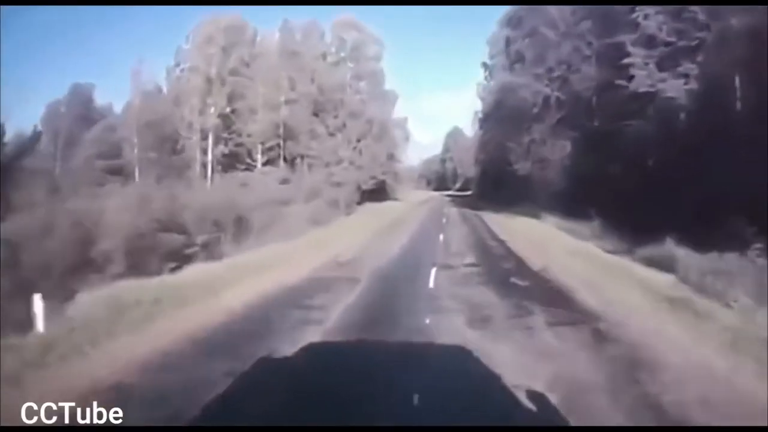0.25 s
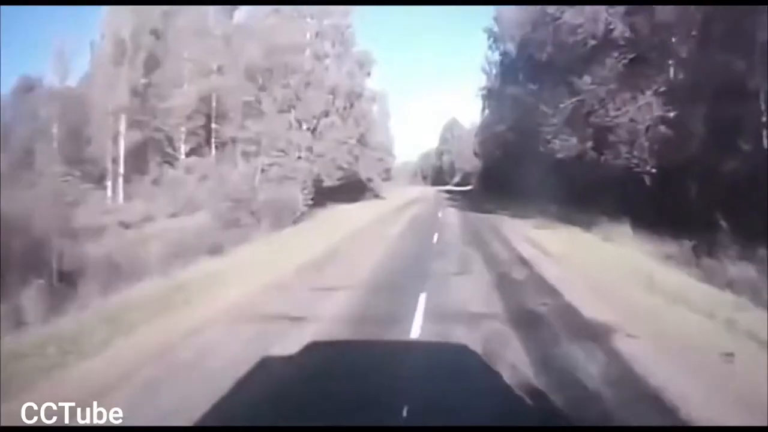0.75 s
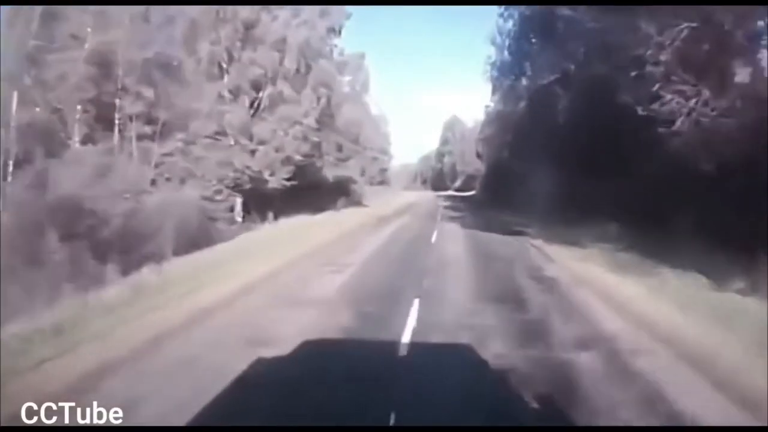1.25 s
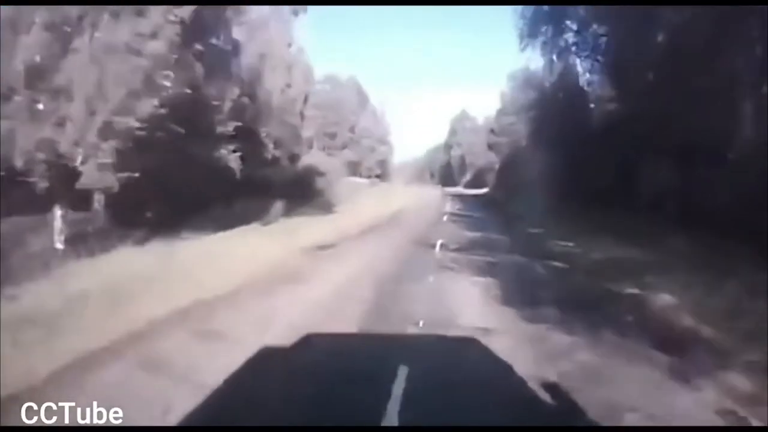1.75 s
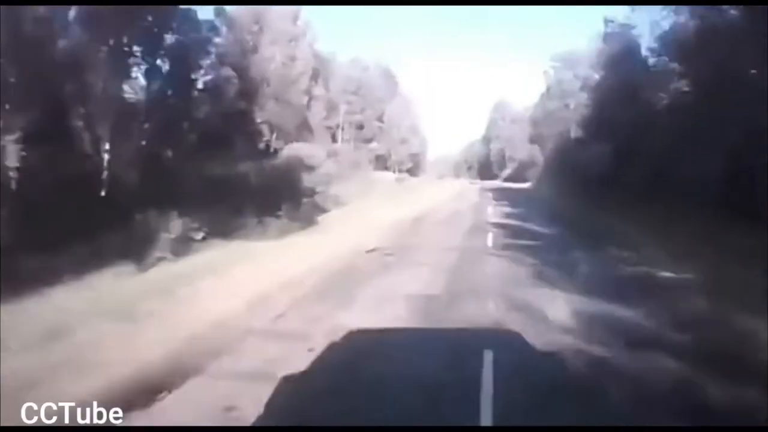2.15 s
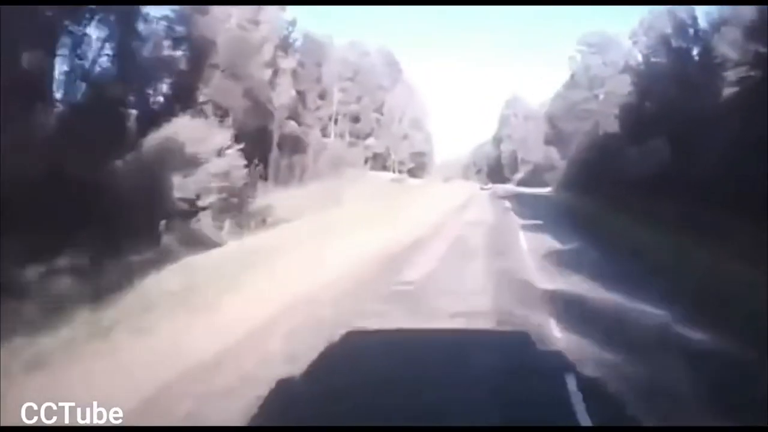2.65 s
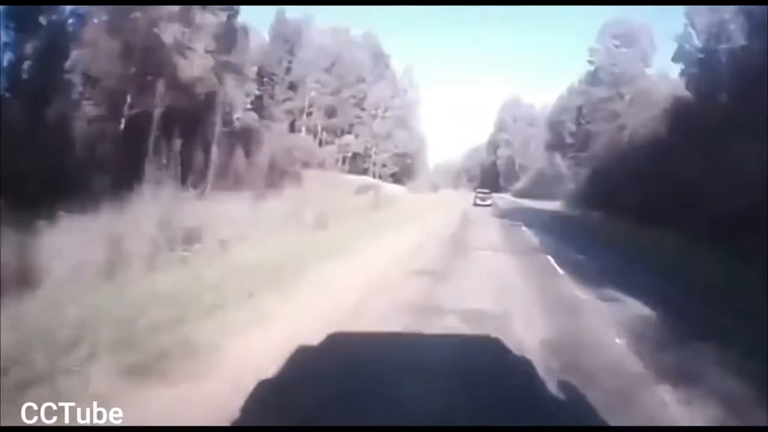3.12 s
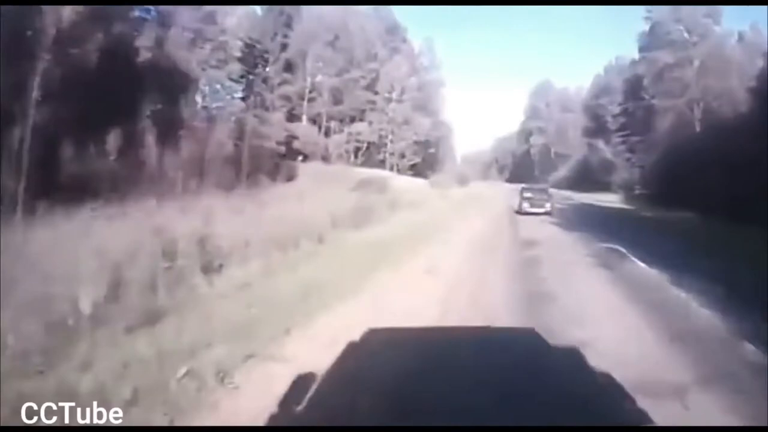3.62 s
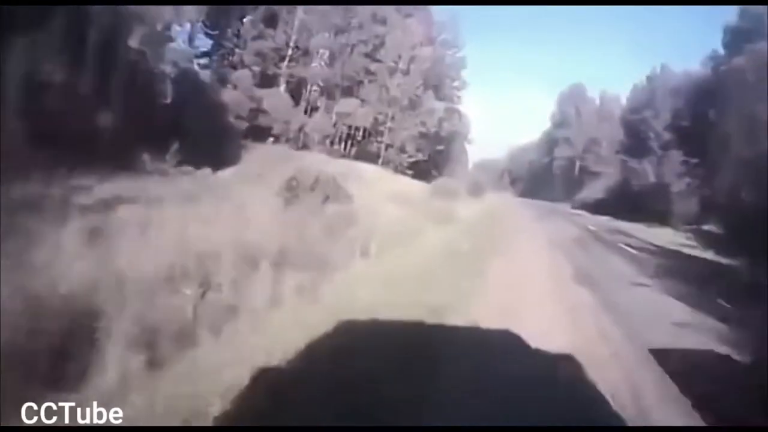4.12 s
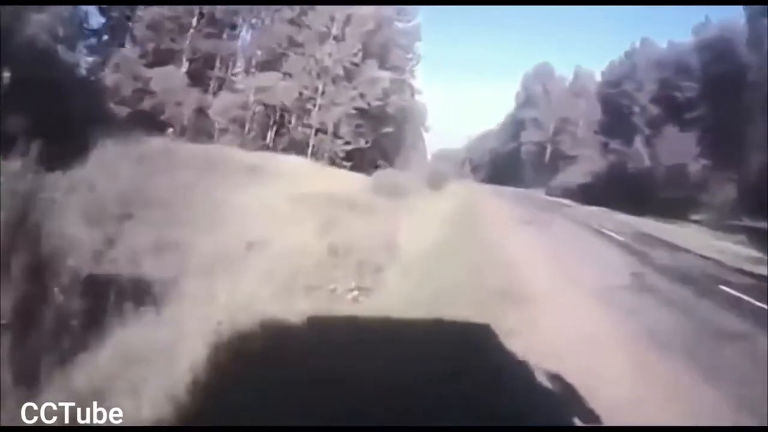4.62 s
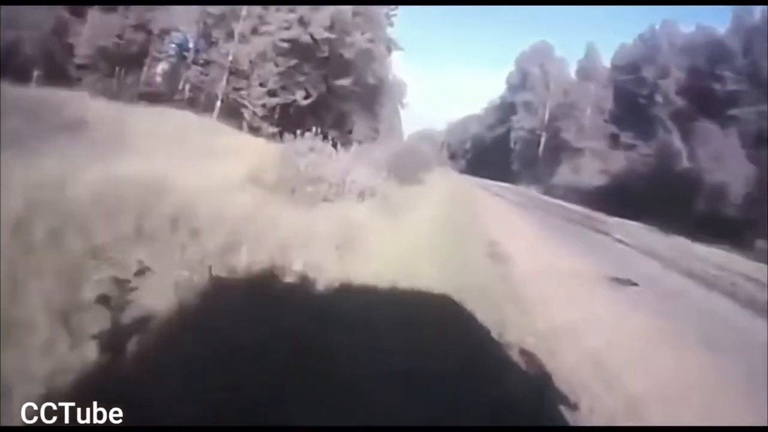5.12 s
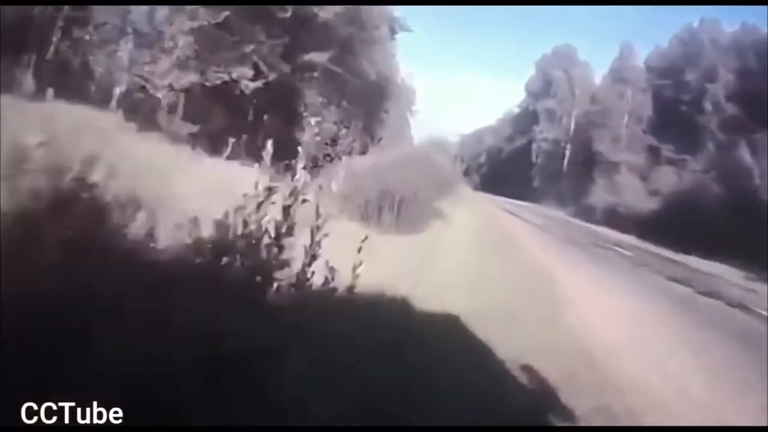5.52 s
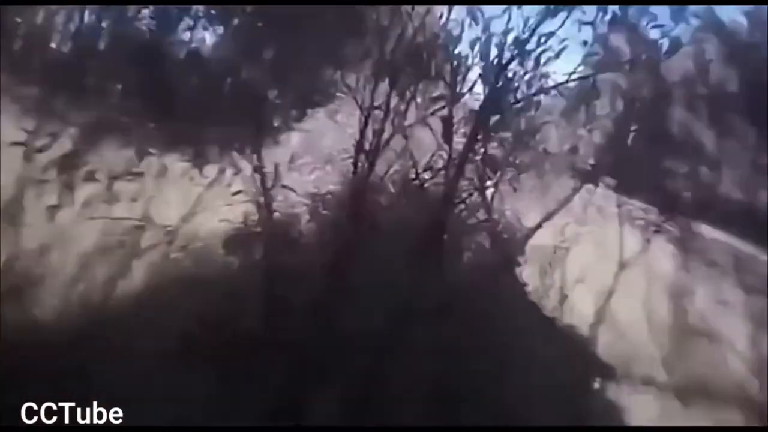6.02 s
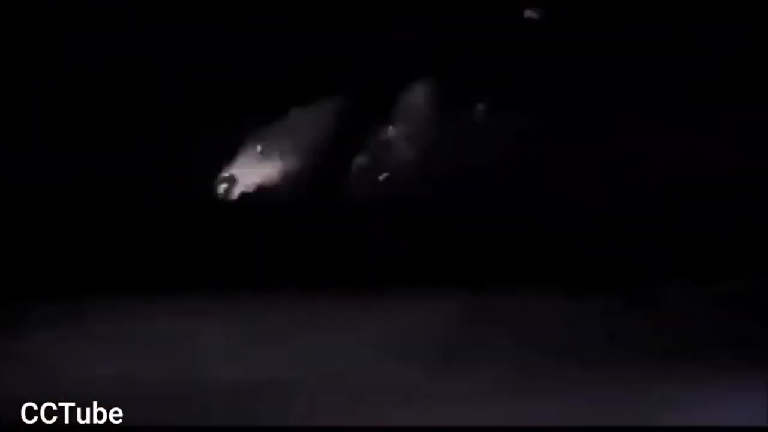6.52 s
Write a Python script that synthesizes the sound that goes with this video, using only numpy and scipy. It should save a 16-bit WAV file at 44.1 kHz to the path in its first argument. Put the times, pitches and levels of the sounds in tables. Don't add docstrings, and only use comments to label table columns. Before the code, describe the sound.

Close, dull and overloaded car interior sound. Nearly two seconds of quiet swaying rumble and tyre noise end in a hard bang and rush of air. The corner drops heavily, and loose rubber beats the bodywork in uneven, then regular hard knocks, with clanging metal, rattling plastic and rough scraping. After jolting along the verge, the car ploughs into a bush with dense snapping and crunching until the cut.

```python
import sys
import numpy as np
from scipy import signal
from scipy.io import wavfile
from scipy.ndimage import uniform_filter1d

SR = 44100
rng = np.random.default_rng(int(sys.argv[2]) if len(sys.argv) > 2 else 0)


def rack_gain(trim_db):
    fader = np.asarray(trim_db, float)
    return 10 ** (fader / 20)


def pcm_store(signal):
    levels = np.round(np.clip(np.atleast_2d(signal), -1, 1) * 32767)
    wavfile.write(sys.argv[1], SR, levels.astype(np.int16).T)


N = 298557
BURST_S = 1.76

# [t/s, level/dB]
GROUND_WORK = [(0, -65), (.3, -60), (.8, -57.5), (1.1, -53), (1.7, -53.5), (1.9, -39.5), (2.2, -43.5),
               (2.8, -47.5), (3.4, -43.5), (3.8, -44.5), (4.2, -40.5), (4.8, -42), (5.2, -44.5), (5.6, -53),
               (6.0, -42), (6.25, -46), (6.5, -32.5), (6.77, -31.5)]
# [f/Hz, level/dB per Hz]
SOUND_TYRE_SWAY = [(5, -10), (9, -2), (13, 0), (20, -8), (35, -16), (60, -26)]
# [f/Hz, level/dB per Hz]
TORN_TYRE_HEAVE = [(2.9, -31), (5.0, -1), (28, 0), (60, -12), (78, -37), (130, -120)]
# [t/s, level/dB]
LURCHES = [(.32, -41.5), (0.799, -27.5), (1.02, -24), (1.32, -20), (1.8, -23), (2.37, -22), (2.58, -21.5),
           (2.73, -23), (2.94, -21), (3.111, -25.5), (3.54, -19.5), (3.69, -21), (3.83, -22), (4.2, -15.5),
           (4.499, -30.5), (5.35, -23), (6.032, -21.5), (6.66, -39)]
# [f/Hz, level/dB per Hz]
FLOOR_RUMBLE = [(24, -27), (40, 1), (97, -6), (189, -12.5), (231, -18.5), (370, -24.5), (400, -33),
                (520, -62), (880, -120)]
# [f/Hz, level/dB per Hz]
TYRE_ROAR = [(120, -39), (200, 2), (331, -9.5), (370, 2), (397, -6.5), (556, -15), (640, 1), (696, -12),
             (1880, -26), (5690, -41), (7400, -76), (12500, -120)]
# [f/Hz, level/dB per Hz]
TORN_SCRAPE = [(120, -39), (200, 1), (495, -3), (569, -8), (953, -15), (1190, -10.5), (1860, -23.5),
               (4300, -36), (5600, -37), (7280, -75), (12300, -120)]
# [f/Hz, level/dB per Hz]
GRIT_RING = [(2500, -30), (2950, 0), (3400, -30)]
# [t/s, rattle level/dB, body level/dB]
BUMPS = [(.731, -70, -51), (.933, -64, -49), (1.27, -66, -53), (1.394, -55, -57), (1.48, -47, -46.5),
         (1.5, -40.5, -46.5), (1.602, -53, -50.5), (2.255, -49.5, -40), (2.384, -29.5, -36),
         (2.448, -42, -50), (2.575, -30.5, -26.5), (2.678, -64, -59), (2.737, -55, -45),
         (2.925, -39.5, -30.5), (3.114, -37.5, -38), (3.262, -42.5, -38.5), (3.413, -40, -56.5),
         (3.481, -39, -48), (3.67, -35, -45), (3.833, -43, -35), (3.901, -45, -29), (3.973, -37, -29.5),
         (4.353, -36, -37.5), (5.001, -43, -44.5), (5.314, -36, -31), (5.471, -44.5, -37.5),
         (5.799, -39, -36), (6.025, -50, -40.5), (6.169, -45, -49)]
# [f/Hz, width/Hz, level/dB]
SHELL_MODES = [(38.8, 25, -10), (71, 8.3, 3.5), (105.6, 29, 13.5), (146, 50, -1), (240, 45, -7)]
# [f/Hz, width/Hz, level/dB]
PANEL_MODES = [(273, 16, -0.5), (362.6, 92, 10), (476.7, 76, 6), (475, 20, 1), (598, 30, -12.5)]
# [f/Hz, level/dB per Hz]
TRIM_COLOUR = [(350, -31), (600, 2.5), (802, 5.5), (905, 0), (1130, 8), (2300, -9.5), (2780, -17.5),
               (4350, -20), (5600, -24), (7280, -65), (12300, -120)]
# [t/s, rattle level/dB, thump level/dB, panel level/dB, snap level/dB]
BURST_BLOWS = [
    (1.765, -10, -13.5, -14.5, -16),
    (1.805, -19.5, -20, -16.5, -18),
    (1.82, -23, -22, -22, -21.5),
    (1.859, -26.5, -34.5, -27.5, -36),
]
# [f/Hz, width/Hz, level/dB]
WELL_MODES = [(150, 40, -3), (195, 45, 0), (240, 50, -2)]
# [t/s, f/Hz, level/dB, decay/s]
CORNER_SWING = (1.853, 19, -11, .05)
# [t/s, rattle level/dB, panel level/dB, snap level/dB, rebound level/dB]
ROAD_SLAPS = [(1.893, -17, -15.5, -51, -15.5), (2.023, -21.5, -21, -35, -26),
              (2.094, -29, -20.5, -61, -2.5), (2.155, -30.5, -19, -62, -23), (2.33, -26, -21, -46.5, -3.5),
              (2.521, -26, -29, -40, -8), (2.796, -25, -21, -40.5, -13), (2.989, -23, -16.5, -33.5, -17.5),
              (3.152, -25, -10, -27.5, -13), (3.351, -25.5, -20.5, -35.5, -10),
              (3.552, -23, -20.5, -40, -26), (3.735, -20, -11, -29, -10)]
# [t/s, rattle level/dB, panel level/dB, snap level/dB, rebound level/dB]
VERGE_SLAPS = [(4.017, -27, -19.5, -38.5, -4), (4.136, -20.5, -17.5, -33.5, -12),
               (4.255, -25.5, -22.5, -43, -15), (4.372, -26, -19.5, -37, -9.5),
               (4.485, -26.5, -26, -46, -10), (4.6, -26.5, -19, -34, -12), (4.713, -23.5, -16.5, -32, -8.5),
               (4.84, -25, -18.5, -49, -27), (4.953, -27.5, -21.5, -37, -11.5),
               (5.087, -31.5, -17.5, -53, -23), (5.216, -32, -28.5, -70, -21.5),
               (5.359, -29, -31, -46, -22), (5.515, -33.5, -28, -49.5, -21), (5.632, -40, -32.5, -80, -2.5),
               (5.82, -27.5, -29.5, -46, -9.5), (5.935, -32.5, -28, -42, 3),
               (6.110, -28.5, -19.5, -39, -9.5)]
# [rattle level/dB, thump level/dB, panel level/dB, snap level/dB]
REBOUND_TILT = (4, 5.5, -7, 6)
# [t/s, rattle level/dB, body level/dB, contact/s, snap level/dB]
BRANCHES = [(6.25, -28.5, -26, 0.01, -31), (6.262, -22, -35, .039, -23.5), (6.278, -13.5, -26, .041, -18.5),
            (6.323, -20.5, -32, 0.032, -23.5), (6.358, -38, -33.5, 0.029, -34.5),
            (6.411, -24, -18, 0.023, -32), (6.433, -19.5, -46, 0.06, -27), (6.474, -29, -40, .033, -32),
            (6.493, -14, -35, 0.05, -22.5), (6.528, -17.5, -25.5, 0.05, -17.5),
            (6.586, -16, -35, 0.027, -34), (6.605, -27, -33.5, 0.044, -29),
            (6.647, -20, -40.5, 0.041, -29.5), (6.669, -21.5, -35, 0.034, -26.5),
            (6.716, -31, -32, 0.059, -25), (6.729, -22, -34, 0.063, -37)]
# [f/Hz, level/dB per Hz]
TWIG_COLOUR = [(1500, -25), (2000, 7), (2300, 3.5), (3000, -15), (4400, -9), (5500, -14)]
# [t/s, level/dB]
CAMERA_VOLUME = [(0, 5), (1.76, 6), (1.85, 5.5), (1.92, 3.5), (2.03, 0), (2.3, -1.5), (2.8, 0), (5.2, 0),
                 (6.1, 0), (6.3, 1.5), (6.77, 1.5)]
# [f/Hz, level/dB]
CAMERA_TONE = [(20, -3), (4800, -1.5), (5500, -7), (5900, -20.5), (7000, -19.5), (9000, -14.5),
               (10200, -31), (14000, -22.5), (16000, -34)]
# [t/s, treble level/dB]
DROPOUTS = [(1.0748, -45), (2.0739, -43.5), (3.0738, -51.5), (4.0708, -49.5), (5.0689, -46.5),
            (6.0669, -47), (6.7654, -51)]
# [f/Hz, level/dB]
STEREO_SPREAD = [(60, -35), (150, -36), (360, -32), (880, -27), (2140, -26), (5240, -24)]


def evened(x):
    return x / np.sqrt(np.mean(x ** 2) + 1e-20)


def read(points, hz):
    f, value = np.transpose(points)
    return np.interp(np.log(hz + 1), np.log(f + 1), value)


def curve(rows):
    t, db = np.transpose(rows)
    return rack_gain(np.interp(np.arange(N) / SR, t, db))


def drift(shape, across_hz, across_t):
    patches = uniform_filter1d(rng.standard_normal(shape), size=across_hz, axis=0)
    return evened(uniform_filter1d(patches, size=across_t, axis=1))


def noise(points, patchy_db, size):
    hz = np.fft.rfftfreq(size, 1 / SR)
    shape = (len(hz), 4 * N // size + 5)
    z = rng.standard_normal(shape) + 1j * rng.standard_normal(shape)
    patches = drift(shape, across_hz=5, across_t=9)
    inside = (hz >= points[0][0]) & (hz <= points[-1][0])
    z = z * rack_gain(read(points, hz)[:, None] + patchy_db * patches) * inside[:, None]
    return evened(signal.istft(z, nperseg=size, noverlap=size - size // 4)[1][:N])


def ring(x, modes):
    out = np.zeros(N)
    for hz, width, db in modes:
        pole = np.exp((2j * np.pi * hz - np.pi * width) / SR)
        out += rack_gain(db) * signal.lfilter([1 - abs(pole)], [1, -pole], x).imag
    return out


def on_sound_tyre():
    return np.arange(N) < BURST_S * SR


def heave():
    sound_tyre = on_sound_tyre()
    sway = noise(SOUND_TYRE_SWAY, patchy_db=-4.5, size=16384)
    torn = noise(TORN_TYRE_HEAVE, patchy_db=2.7, size=16384)
    motion = uniform_filter1d(np.where(sound_tyre, sway, torn), size=65)
    t, lurch_s = np.arange(N) / SR, 0.059
    coarse_t = t[::64]
    lurch = sum(rack_gain(db) / (1 + ((coarse_t - s) / lurch_s) ** 2) ** 2 for s, db in LURCHES)
    strength = curve(GROUND_WORK) * rack_gain(np.where(sound_tyre, 22, 12)) + np.interp(t, coarse_t, lurch)
    travel = .042 * curve(CAMERA_VOLUME)
    return travel * np.tanh(strength * motion / travel)


def rumble():
    work = curve(GROUND_WORK) * rack_gain(np.where(on_sound_tyre(), 11.5, 2))
    return np.hypot(work, rack_gain(-14) * wake(axis=2)) * noise(FLOOR_RUMBLE, patchy_db=2.0, size=4096)


def roar():
    sound_tyre = on_sound_tyre()
    rolling = noise(TYRE_ROAR, patchy_db=1.5, size=512)
    scrape = noise(TORN_SCRAPE, patchy_db=3.0, size=512)
    grit = rack_gain(-25) * noise(GRIT_RING, patchy_db=6.0, size=512)
    texture = np.where(sound_tyre, rolling, scrape + grit)
    return np.hypot(curve(GROUND_WORK), rack_gain(-20) * wake(axis=1)) * texture


def wake(axis):
    kicks = np.zeros(N)
    t = np.arange(SR // 2) / SR / 0.05
    for row in blows():
        kicks[round(row[0] * SR)] += min(rack_gain(row[axis]), .1) ** 2
    swell = (np.e * t * np.exp(-t)) ** 2 * np.exp(-t)
    return np.sqrt(abs(signal.oaconvolve(kicks, swell)[:N]))


def bump_blows():
    return [(s, rattle, body, body, 0.031, rattle - 10.5) for s, rattle, body in BUMPS]


def burst_blows():
    return [(s, rattle, thump, panel, .033, snap) for s, rattle, thump, panel, snap in BURST_BLOWS]


def slap_blows():
    rows = []
    for s, rattle, panel, snap, rebound in ROAD_SLAPS + VERGE_SLAPS:
        thump = rattle - 1.5 + 0.45 * (panel - rattle)
        rows.append((s, rattle, thump, panel, .033, snap))
        a, b, c, d = np.array([rattle, thump, panel, snap]) + REBOUND_TILT + rebound
        rows.append((s + .033, a, b, c, 0.022, d))
    return rows


def branch_blows():
    return [(s, rattle, body, body, contact_s, snap) for s, rattle, body, contact_s, snap in BRANCHES]


def blows():
    return burst_blows() + slap_blows() + bump_blows() + branch_blows()


def shaking(axis, rise_s, slower, sag_db):
    power = np.zeros(N + SR)
    t = np.arange(SR // 4) / SR
    for row in blows():
        u = t / (slower * max(row[4], .005))
        soft = np.clip(rack_gain(-0.8 * (row[1] + 26)), .2, 3)
        shape = (1 - np.exp(-t / (soft * rise_s))) * rack_gain(row[axis] - sag_db * u - 5.14 * u ** 4)
        shape += (1 - np.exp(-t / 0.0048)) * rack_gain(row[axis] - 27.5 - 130 * t)
        power[round(row[0] * SR):][:len(t)] += shape ** 2
    return np.sqrt(power[:N])


def clicks(per_s, spread_db):
    hit, sign, size = rng.random((3, N))
    strength = rack_gain(np.minimum(-np.log(size + 1e-9), 4) * spread_db)
    out = (hit < per_s / SR) * np.sign(sign - .5) * strength
    out[[round((row[0] + .001) * SR) for row in blows()]] = -rack_gain(1.7 * spread_db)
    return out


def struck_body(axis, modes, rise_s, slower, per_s, boost_db):
    contacts = clicks(per_s, spread_db=2.0)
    scale = np.std(ring(contacts, modes))
    return rack_gain(boost_db) * ring(contacts * shaking(axis, rise_s, slower, sag_db=9), modes) / scale


def rattle(axis, colour, per_s, cycles, boost_db):
    pitches_hz = np.geomspace(colour[1][0], colour[-2][0], num=24)
    which, t = rng.integers(0, len(pitches_hz), N), np.arange(600) / SR
    drive = shaking(axis, rise_s=0.0023, slower=0.97, sag_db=8.5)
    loose_db = 4.0 * rng.standard_normal((N // 1024 + 1, len(pitches_hz)))
    contacts = clicks(per_s, spread_db=1.0) * rack_gain(loose_db[np.arange(N) // 1024, which])
    out, steady = np.zeros(N), 0
    for k, hz in enumerate(pitches_hz):
        own = contacts * (which == k)
        tap = rack_gain(read(colour, hz) - 60 * t * hz / cycles) * np.sin(2 * np.pi * hz * t) * hz
        out += signal.oaconvolve(own * drive, tap)[:N]
        steady += np.sum(own ** 2) * np.sum(tap ** 2) / N
    return rack_gain(boost_db) * out / np.sqrt(steady)


def shell_thump():
    return struck_body(axis=2, modes=SHELL_MODES, rise_s=0.0017, slower=1.38, per_s=450, boost_db=2)


def panel_clang():
    return struck_body(axis=3, modes=PANEL_MODES, rise_s=.001, slower=1.017, per_s=500, boost_db=-2.0)


def trim_rattle():
    return rattle(axis=1, colour=TRIM_COLOUR, per_s=1900, cycles=22.6, boost_db=-4.5)


def air_boom():
    after = np.arange(N) / SR - BURST_BLOWS[0][0]
    air = evened(ring(rng.standard_normal(N), WELL_MODES))
    return rack_gain(-15) * air * (after > 0) * np.exp(-abs(after) / .07)


def corner_swing():
    s, hz, db, decay_s = CORNER_SWING
    u = np.maximum(np.arange(N) / SR - s, 0)
    return -rack_gain(db) * np.sin(2 * np.pi * hz * u) * np.exp(-u / decay_s)


def brittle_snaps():
    return rattle(axis=5, colour=TWIG_COLOUR, per_s=900, cycles=11.1, boost_db=-4)


def scene():
    driving = heave() + rumble() + roar()
    struck = shell_thump() + panel_clang() + trim_rattle() + brittle_snaps()
    cabin = (driving + struck + air_boom() + corner_swing()) / curve(CAMERA_VOLUME)
    return np.array([cabin, cabin])


def overload(x):
    rail = np.where(x > 0, .07, .17)
    return x / (1 + abs(x / rail) ** 4.5) ** (1 / 4.5) + .05 * np.clip(x, -.4, .4)


def smear(x, size):
    hz, _, z = signal.stft(x, SR, nperseg=size)
    return hz, z * np.exp(2j * np.pi * rng.random(z.shape))


def haze_and_holes(x):
    hz, z = smear(x, size=2048)
    x = x + signal.istft(z * rack_gain(-18) * (hz > 250)[:, None], SR, nperseg=2048)[1][:N]
    hz, t, z = signal.stft(x, SR, nperseg=1024)
    treble = (hz > 2300) & (hz < 5800)
    treble_level = abs(z[treble]).mean(axis=0)
    patches = drift(z.shape, across_hz=3, across_t=12)
    block_luck = evened(uniform_filter1d(rng.standard_normal(len(t)), size=2))
    starved = block_luck + .8 * patches > -.1
    quiet = (t < BURST_S - .04) & (treble_level < rack_gain(-92))
    weak = treble[:, None] & starved & quiet
    lull = (treble_level < rack_gain(-80)) & (t > BURST_S)
    weak |= ((hz > 3800) & (hz < 5800))[:, None] & lull & (patches > 1.0)
    return signal.istft(z * np.where(weak, rack_gain(-13), 1), SR, nperseg=1024)[1][:N]


def drop_samples(mono):
    leak = np.exp(-np.arange(2000) / SR / 0.0026)
    step = signal.oaconvolve(leak, signal.firwin(11, 9500, fs=SR))
    for s, db in DROPOUTS:
        at = round((s + 0.002) * SR)
        mono[at:at + len(step)] -= rack_gain(db + 21.5) * step[:N - at]
    return mono


def stereo_haze(mono):
    hz, z = smear(mono, size=1024)
    apart = rng.random(z.shape[1]) < .22
    side = signal.istft(z * apart * rack_gain(read(STEREO_SPREAD, hz) + 9)[:, None], SR, nperseg=1024)[1][:N]
    return np.array([side, -side])


def hiss():
    common, apart = rng.standard_normal((2, N))
    common, apart = rack_gain(-89.5) * common, rack_gain(-104) * apart
    return np.array([common + 0.97 * apart, common - apart])


def band_limit(x):
    return signal.sosfilt(signal.butter(12, 15700, fs=SR, output="sos"), x)


def record(dry):
    hz = np.linspace(0, SR / 2, num=257)
    tone = signal.firwin2(255, hz, rack_gain(read(CAMERA_TONE, hz)), fs=SR)
    loud = overload(dry[0]) * curve(CAMERA_VOLUME)
    mono = drop_samples(haze_and_holes(signal.oaconvolve(loud, tone, "same")))
    offset = .011 * np.clip(np.arange(N) / SR + .25, 0, 1)
    return band_limit(mono + offset + stereo_haze(mono) + hiss())


dry = scene()
out = record(dry)
pcm_store(out)
```